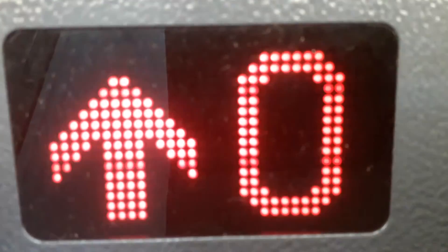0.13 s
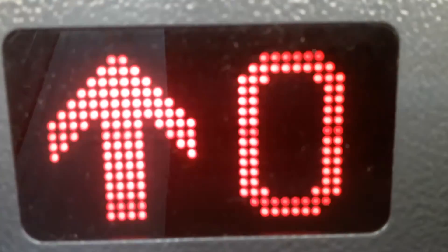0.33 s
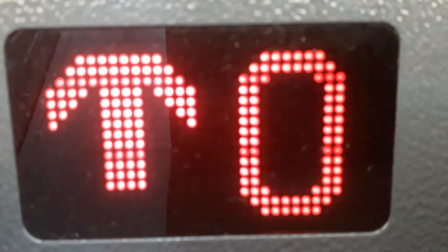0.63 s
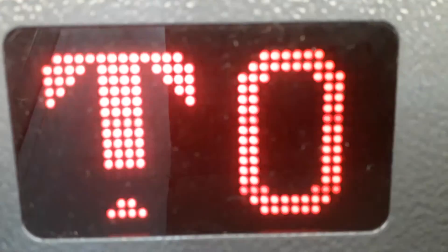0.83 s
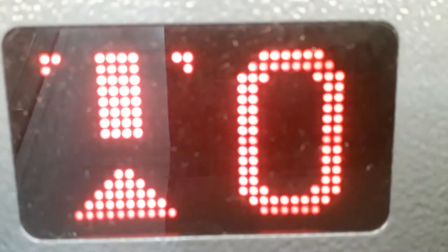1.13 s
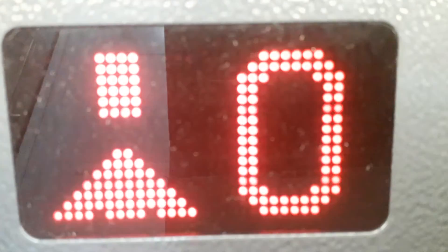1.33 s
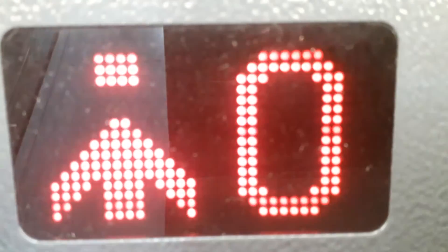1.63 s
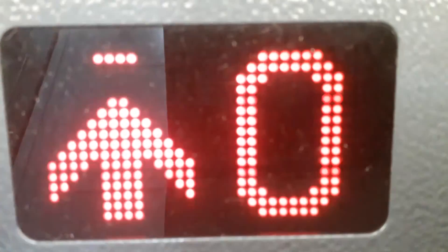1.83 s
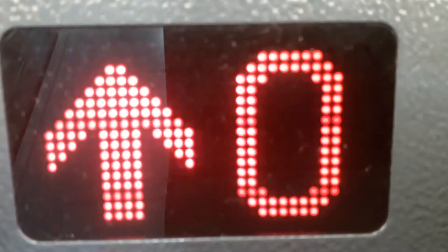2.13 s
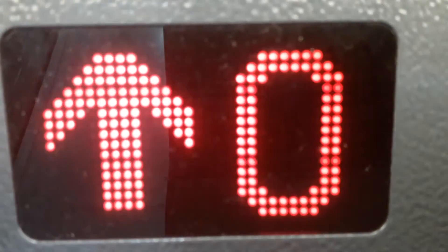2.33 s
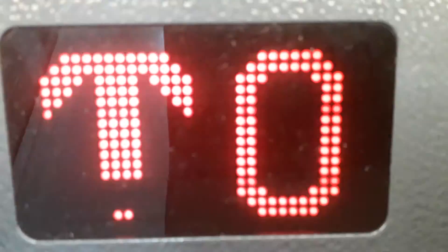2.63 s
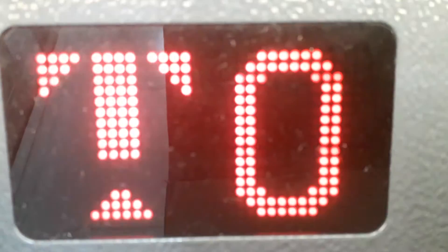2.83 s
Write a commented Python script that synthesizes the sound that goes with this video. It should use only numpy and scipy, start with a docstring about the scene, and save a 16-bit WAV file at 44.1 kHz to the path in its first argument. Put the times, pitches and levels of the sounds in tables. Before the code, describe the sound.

Lift drive hum and soft panel rumble, with a hissy guide-rail whirr surging about every second.

```python
"""Inside the car of a slow lift. A mains motor hums at twice the mains frequency, a sum of sines that beats
slowly against its rotor, which slips a little behind the field. The drive rumbles in the car's panels: shaped
noise and resonances. About once a second something rubs along the guides: noise bands swell as a breathy whirr
with a brighter hiss, and narrow resonant noise makes faint whistles that come and go. The microphone hisses."""
import sys
import numpy as np
from scipy import signal
from scipy.fft import rfft, irfft
from scipy.io import wavfile

SR = 44100
rng = np.random.default_rng(int(sys.argv[2]) if len(sys.argv) > 2 else 0)


def wrap_up_sound(samples):
    """Save the sound to the file named by the first command line argument, as 16-bit audio."""
    columns = np.atleast_2d(samples).T
    # keep every value between -1 and 1, then stretch to whole-number steps
    tamed = np.clip(columns, -1, 1)
    steps = np.round(tamed * 32767).astype(np.int16)
    wavfile.write(sys.argv[1], SR, steps)


N = 132300
TIME_S = np.arange(N) / SR


def from_db(db):
    """Gain of a level in dB."""
    return 10 ** (np.asarray(db) / 20)


def rms_one(x):
    """Scale to rms 1."""
    return x / np.sqrt(np.mean(x ** 2) + 1e-20)


def in_time(rows):
    """Columns of a table whose first column is t/s, drawn out to one value a sample."""
    s, *columns = np.transpose(rows)
    return [np.interp(TIME_S, s, column) for column in columns]


def drift(corner_hz):
    """Slow random wander of spread 1: noise through two equal low-pass poles."""
    step = 40  # samples between the values drawn
    pole = np.exp(-2 * np.pi * corner_hz * step / SR)
    settle = 2000
    draws = rng.standard_normal(N // step + settle + 2)
    slow = signal.lfilter([1], [1, -2 * pole, pole ** 2], draws)[settle:]
    return np.interp(np.arange(N) / step, np.arange(len(slow)), rms_one(slow - slow.mean()))


def coloured(spectrum, patchy_db):
    """Noise of a given spectrum whose third-octave bands each flicker on their own; rms 1."""
    hz = np.fft.rfftfreq(N, 1 / SR) + 1e-3  # kept off zero for the logarithm
    at_hz, level_db = np.transpose(spectrum)
    curve_db = np.interp(np.log(hz), np.log(at_hz), level_db, -120, -120)
    shaped = rfft(rng.standard_normal(N)) * from_db(curve_db)
    place = 3 * np.log2(hz / at_hz[0])  # in third octaves above the lowest point
    band_count = int(3 * np.log2(at_hz[-1] / at_hz[0])) + 2
    total = 0
    for k in range(band_count):
        overlap = np.clip(1 - abs(place - k), 0, 1)  # neighbouring bands crossfade
        total = total + irfft(shaped * overlap, N) * from_db(patchy_db * drift(2.9))
    return rms_one(total)


def narrow(hz, width_hz):
    """Noise through one resonance, twice; rms 1."""
    pole = np.exp(-np.pi * width_hz / SR)
    ring = [1, -2 * pole * np.cos(2 * np.pi * hz / SR), pole ** 2]
    noise = rng.standard_normal(N + SR // 4)  # the first quarter second lets it settle
    once = signal.lfilter([1, 0, -1], ring, noise)
    return rms_one(signal.lfilter([1], ring, once)[-N:])


def motor():
    """Sines at sums of mains and rotor multiples; neighbours a slip apart beat, loudest at their crest time."""
    mains_hz, rotor_hz = 49.975, 49.245
    waver_db = 0.07
    # motor tones: mains multiple, rotor multiple, crest t/s, rms level at the start/dB, fade/(dB per s)
    orders = [(0, 1, 0, -63.5, .6), (2, 0, 0, -31.0, 2.1), (0, 2, .138, -40.9, 2.3), (4, 0, 0, -53, -.5),
              (2, 2, .337, -51, 1.2), (6, 0, 0, -69, -3.0), (4, 2, .36, -76, -4.0), (8, 0, 0, -64, 4.0),
              (12, 0, 0, -63, 5.0)]
    hum = 0
    for mains, rotor, crest_s, db, fade in orders:
        slip_hz = rotor * (mains_hz - rotor_hz)
        field_turns = (mains + rotor) * mains_hz * TIME_S
        slip_turns = slip_hz * (TIME_S - crest_s)
        level = from_db(db - fade * TIME_S + waver_db * drift(5.1))
        hum = hum + np.sqrt(2) * level * np.sin(2 * np.pi * (field_turns - slip_turns))
    return hum


def rumble():
    """Broad drive noise and the panels that it stirs, deep and upper part swelling apart; lumpy lows below."""
    # drive noise in the car: f/Hz, relative density/dB per Hz
    broad_spectrum = [(150, -4), (210, -2), (342, -10), (420, -6.5), (550, -9.5), (800, -13.5), (1200, -17),
                      (1650, -31), (2050, -27), (2600, -59.5), (3500, -48.5), (4200, -70)]
    # panel resonances stirred by the drive: f/Hz, width/Hz, level before the swelling/dB
    panel_modes = [(232.7, 11, -69.5), (393.9, 12.5, -60), (507.7, 15, -61.5), (607.4, 18, -66),
                   (759, 31, -65), (862, 22, -65.5), (1026.6, 22, -65.5), (1132, 35, -67)]
    # level of the rumble: t/s, deep part/dB, upper part/dB
    swelling = [(.05, -49.5, -54.5), (.3, -47, -50), (.46, -45.5, -50.5), (.56, -51, -53),
                (.75, -50.5, -60), (.95, -50, -57), (1.06, -48.5, -52.5), (1.25, -49, -52),
                (1.48, -48, -54), (1.53, -45, -50), (1.66, -47, -50), (1.85, -50.5, -50), (2.1, -48.5, -54),
                (2.35, -47.5, -50.5), (2.57, -48.5, -49), (2.68, -49, -53.5), (2.85, -46.5, -58),
                (2.97, -49.5, -57)]
    # levels at which each part passes unchanged: deep/dB, upper/dB
    reference_levels = (-49, -54)
    # lumpy lows: f/Hz, relative density/dB per Hz
    low_spectrum = [(15, -29), (36, -23.5), (49, -17.5), (60, -16), (72, -13), (90, -8), (120, -2.5),
                    (150, -1.5), (180, -5.5), (230, -17.5), (300, -33)]
    broad_db, broad_patchy_db = -48, 1.63  # level before the swelling
    panel_wander_db, split_hz = 1.8, 700
    lows_start_db, lows_rise_db_per_s, lows_patchy_db = -50, 1.6, 2

    body = from_db(broad_db) * coloured(broad_spectrum, broad_patchy_db)
    for hz, width_hz, db in panel_modes:
        body = body + from_db(db + panel_wander_db * drift(1.1)) * narrow(hz, width_hz)
    low_pass = signal.butter(2, split_hz, fs=SR, output="sos")
    deep = signal.sosfiltfilt(low_pass, body)
    upper = body - deep
    deep_db, upper_db = in_time(swelling)
    deep_reference_db, upper_reference_db = reference_levels
    swelled = from_db(deep_db - deep_reference_db) * deep + from_db(upper_db - upper_reference_db) * upper
    lows_level = from_db(lows_start_db + lows_rise_db_per_s * TIME_S)
    return swelled + lows_level * coloured(low_spectrum, lows_patchy_db)


def rubbing():
    """Four bands of friction noise swell and fade; the rail's resonances stand out of them."""
    # rubbing on the guides, before the rail's lift:
    # t/s, whirr level/dB, upper whirr level/dB, level of the valley above it/dB, hiss level/dB
    rub_levels = [(0.04, -62, -72.5, -77, -68), (0.13, -64.5, -74.5, -87, -71.5),
                  (0.27, -58, -72.5, -85, -71.5), (0.41, -50.5, -67, -75, -66),
                  (0.45, -47.5, -63, -63, -61.5), (0.47, -51, -63, -65.5, -63.5),
                  (0.81, -53.5, -67, -69.5, -63), (0.96, -63.5, -72, -75, -64.5),
                  (1.06, -58, -70.5, -71.5, -63.5), (1.17, -61.5, -76, -80, -68),
                  (1.32, -59.5, -78, -89, -70.5), (1.52, -51.5, -64, -71, -64),
                  (1.62, -53.5, -67, -72, -64.5), (1.82, -57, -67.5, -75, -65.5),
                  (1.92, -55.5, -64, -73, -65), (1.99, -54.5, -65, -74, -65.5),
                  (2.1, -63.5, -65.5, -76, -68.5), (2.39, -57, -69.5, -85, -72.5),
                  (2.59, -52, -62.5, -71, -66), (2.77, -54.5, -67, -75, -67), (2.95, -62.5, -75, -82, -70),
                  (2.97, -62, -75, -79, -71)]
    # the four bands, each f/Hz, relative density/dB per Hz
    whirr_spectrum = [(1000, -21), (1300, -2.5), (1500, 0.5), (1950, -3), (2060, -9.5), (2550, -11.5),
                      (2700, -16.5), (3000, -26.5)]
    upper_whirr_spectrum = [(2400, -14.5), (2750, -0.5), (3200, 1.5), (3550, -1), (3700, -16.5),
                            (3900, -27)]
    valley_spectrum = [(3400, -13), (3700, -.5), (4050, -2.5), (4300, -1.5), (4600, -18)]
    hiss_spectrum = [(4000, -33), (4400, -3), (4950, 0), (5600, -7), (6600, -6), (7750, -7), (8000, -14.5),
                     (9000, -23), (11000, -25), (13000, -18), (15600, -30)]
    # resonances of the rail that the rubbing brings out: f/Hz, width/Hz, lift/dB
    rail_modes = [(1380, 17, 3), (1457, 12, 7.5), (1635, 13, 0.5), (1713, 17, 1), (1890, 15, 6),
                  (2245, 20, 11), (2478, 110, 3.5), (2970, 30, 2.5), (3200, 38, 0), (3370, 50, -2),
                  (4250, 45, 5.5), (5010, 47, 0.5), (6360, 68, 3.5)]
    patchy_db = 1.6

    spectra = (whirr_spectrum, upper_whirr_spectrum, valley_spectrum, hiss_spectrum)
    friction = 0
    for db, spectrum in zip(in_time(rub_levels), spectra):
        friction = friction + from_db(db) * coloured(spectrum, patchy_db)
    hz = np.fft.rfftfreq(N, 1 / SR)
    lift_db = 0
    for centre_hz, width_hz, db in rail_modes:
        lift_db = lift_db + db / (1 + (2 * (hz - centre_hz) / width_hz) ** 2)
    return irfft(rfft(friction) * from_db(lift_db), N)


def whistles():
    """Narrow breathy tones, resonant noise with soft edges."""
    # faint whistles in the rubbing: start t/s, length/s, f/Hz, width/Hz, level/dB
    whistle_rows = [(0.14, 0.26, 2035, 30, -65), (.55, 0.26, 1797, 151, -59),
                    (0.623, 0.33, 1417, 30, -60.5), (0.877, 0.21, 4900, 250, -69),
                    (0.983, .2, 2000, 30, -67.5), (1.105, 0.14, 1478, 35.1, -64),
                    (1.432, 0.29, 1470, 35.2, -62.5), (1.51, 0.092, 670, 90, -52.5),
                    (1.73, 0.14, 1472, 22, -55.5), (1.94, .09, 1430, 25, -53), (1.98, .12, 3540, 90, -69.5),
                    (2.05, 0.26, 1810, 35, -66.5), (2.238, .17, 2033, 45, -63.5),
                    (2.296, 0.093, 1373, 30, -64), (2.5, 0.32, 5000, 200, -73)]
    edge_s = .05  # each edge is at half gain at the start or end time
    total = 0
    for start_s, length_s, hz, width_hz, db in whistle_rows:
        nearest_edge_s = np.minimum(TIME_S - start_s, start_s + length_s - TIME_S)
        gate = np.clip(nearest_edge_s / edge_s + .5, 0, 1)
        total = total + from_db(db) * narrow(hz, width_hz) * gate
    return total


def scene():
    """All sources in the car, one channel."""
    return (motor() + rumble() + rubbing() + whistles())[None]


def record(dry):
    """The microphone adds its hiss, then a steep low-pass cuts the top."""
    # microphone hiss: f/Hz, relative density/dB per Hz
    mic_spectrum = [(5000, -23.5), (8500, -15), (8960, -13), (9780, -9), (12000, 0), (14000, -0.5),
                    (15500, 3)]
    mic_db, cutoff_hz = -77, 15640  # hiss level before the cut
    hiss = from_db(mic_db) * coloured(mic_spectrum, .5)
    low_pass = signal.ellip(14, .3, 80, cutoff_hz, fs=SR, output="sos")  # ripple .3 dB, stop band 80 dB down
    return signal.sosfilt(low_pass, dry + hiss)


dry = scene()
out = record(dry)
wrap_up_sound(out)
```